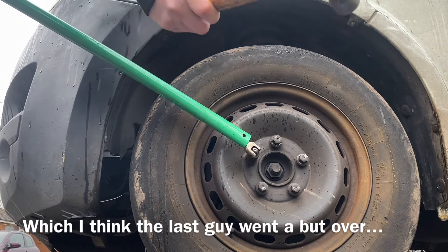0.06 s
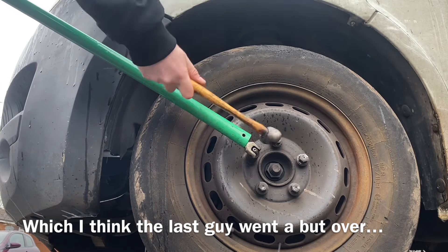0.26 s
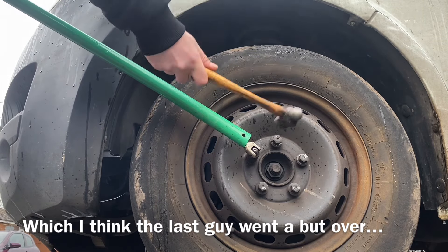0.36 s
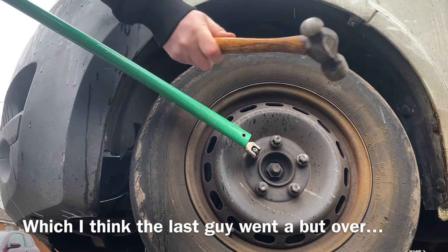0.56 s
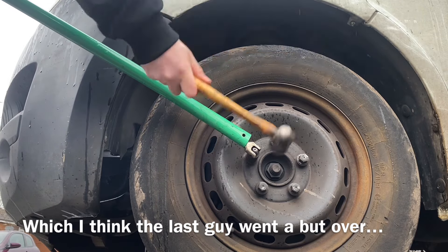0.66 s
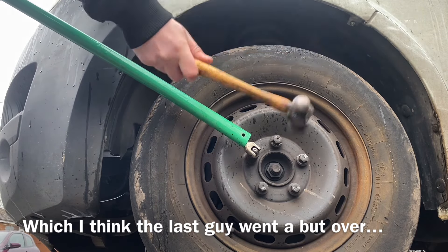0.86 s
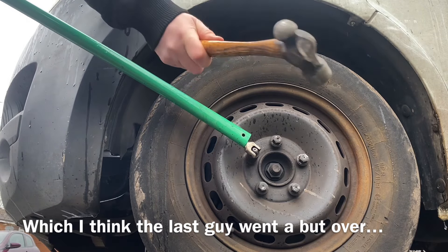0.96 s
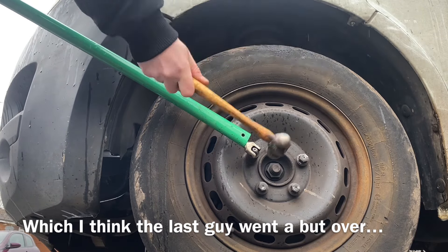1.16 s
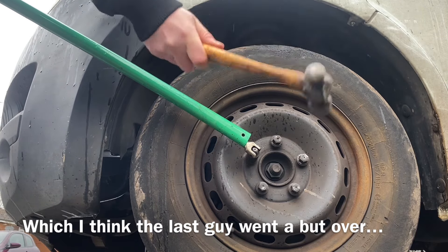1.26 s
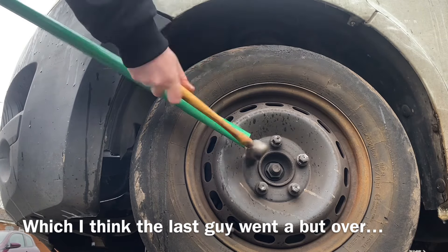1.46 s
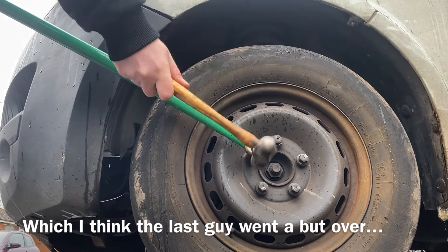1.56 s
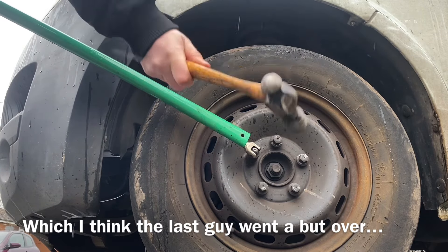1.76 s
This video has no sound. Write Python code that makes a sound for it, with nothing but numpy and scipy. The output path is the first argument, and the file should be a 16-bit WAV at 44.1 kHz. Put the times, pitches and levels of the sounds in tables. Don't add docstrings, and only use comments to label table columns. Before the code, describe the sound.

A hammer strikes a metal bar on a wheel nut, close and outdoors. Faint low wind and far traffic open, with tiny metal ticks near 0.07 and 0.18 seconds. Sharp clanks land at about 0.25, 0.7, 1.1 and 1.48 seconds, each with brief chatter, a dull wheel thump, short arch hiss and thin ringing. The last is brightest and heaviest; a faint yard reflection lingers.

```python
import sys
import numpy as np
from scipy import signal
from scipy.fft import rfft, irfft
from scipy.io import wavfile
from scipy.ndimage import uniform_filter1d

SR = 44100
rng = np.random.default_rng(int(sys.argv[2]) if len(sys.argv) > 2 else 0)


def voltage_ratio(decibels):
    exponent = np.asarray(decibels, float) / 20
    return 10 ** exponent


def dump(signal):
    limited = np.clip(np.atleast_2d(signal).T, -1, 1)
    pcm = np.round(limited * 32767).astype(np.int16)
    wavfile.write(sys.argv[1], SR, pcm)


N = 79380


def evened(x):
    return x / np.sqrt(np.mean(x ** 2) + 1e-20)


def read(points, hz):
    f, value = np.transpose(points)
    return np.interp(np.log(hz + 1), np.log(f + 1), value)


def add(mix, s, sound):
    part = mix[:, round(s * SR):][:, :sound.shape[-1]]
    part += sound[..., :part.shape[1]]


def seconds_axis(seconds):
    return np.arange(round(seconds * SR)) / SR


def noise(size, tone, same, tilt_db=0, peaks=()):
    hz = np.fft.rfftfreq(size, 1 / SR)
    left, other = rfft(rng.standard_normal((2, size)))
    likeness = np.clip(read(same, hz), 0, 1)
    level_db = read(tone, hz) + tilt_db * np.log2((hz + 50) / 2000)
    for centre_hz, width_hz, db in peaks:
        level_db = level_db + db / (1 + (2 * (hz - centre_hz) / width_hz) ** 2)
    knots = np.arange(0, SR / 2, 60)
    ripple_db = 5 * np.interp(hz, knots, rng.standard_normal(len(knots))) * (hz > 1500)
    right = likeness * left + np.sqrt(1 - likeness ** 2) * other
    return evened(irfft(np.array([left, right]) * voltage_ratio(level_db + ripple_db), size))


def dying(x, t60s):
    size = x.shape[1]
    hz, t = np.fft.rfftfreq(size, 1 / SR), np.arange(size) / SR
    spectrum = rfft(x)
    centres = np.log([f for f, _ in t60s])
    out = 0
    for row, (_, t60) in zip(np.eye(len(t60s)), t60s):
        window = np.interp(np.log(hz + 1), centres, row)
        out = out + irfft(spectrum * window, size) * voltage_ratio(-60 * t / t60)
    return out


def modes(table, seconds, spread_db, detune, turn):
    t, out = seconds_axis(seconds), 0
    for hz, db, t60 in table:
        u = rng.uniform(-0.76, 1, 5)
        side_turn = turn * u[1] * min(hz / 2000, 1)
        phase = np.pi * u[0] + np.array([[0], [side_turn]])
        fade = voltage_ratio(db + spread_db * u[2:4, None] - 60 * t / t60)
        out = out + fade * np.sin(2 * np.pi * hz * (1 + detune * u[4]) * t + phase)
    return out * np.minimum(t / 0.0048, 1)


# time_s, level_db
RUMBLE_LEVEL = [(0, -58), (.05, -56.5), (.3, -57.5), (.456, -49.5), (.62, -47), (.78, -56), (1.0, -61),
                (1.25, -53.5), (1.42, -60.5), (1.62, -50.5), (1.8, -61)]
# pitch_hz, level_db
RUMBLE_TONE = [(28, -30), (48, -1), (65, 0), (130, -8), (210, -17), (400, -28), (900, -50), (2500, -110)]
# pitch_hz, width_hz, level_db
RUMBLE_PEAKS = [(61.4, 8.3, 6.5), (133, 4, 10.5), (210, 39, 7.5)]
# pitch_hz, level_db
FLOOR_TONE = [(150, -27), (250, -7.5), (900, -11.5), (1150, -17), (2700, -25), (11000, -39.5),
              (12500, -67.5)]
# pitch_hz, likeness_0_to_1
SAME_FAR = [(60, 1), (180, 0.94), (550, 0.33), (1650, 0.027), (5000, 0.028), (15000, 0.5)]


def outdoors():
    t = np.arange(N) / SR
    lump = voltage_ratio(0.38 * evened(uniform_filter1d(rng.standard_normal(N), 2500)))
    swing = voltage_ratio(np.interp(t, *np.transpose(RUMBLE_LEVEL)))
    rumble = noise(N, RUMBLE_TONE, SAME_FAR, peaks=RUMBLE_PEAKS) * swing * lump
    return rumble + voltage_ratio(-69) * noise(N, FLOOR_TONE, SAME_FAR)


# start_s, level_db, pitch_hz
TICKS = [
    (.0668, -51.5, 2870),
    (.0668, -58, 5230),
    (.0668, -62.5, 1500),
    (.177, -59, 3330),
]


def add_ticks(mix):
    t = np.arange(200) / SR
    for s, db, hz in TICKS:
        add(mix, s, voltage_ratio(db - 60 * t / 0.0089) * np.sin(2 * np.pi * hz * t))


# pitch_hz, level_db
YARD_TONE = [(200, -14.5), (600, -9), (1500, -10), (3000, -19.5), (6300, -17), (7600, -13), (8300, -51),
             (16500, -78.5)]
# pitch_hz, t60_s
YARD_T60 = [(300, 1.4), (2000, 0.85), (5000, 1.01), (10000, 0.2), (15000, 0.48)]
# pitch_hz, width_hz, level_db
PANELS = [(586, 14, 22), (762, 18, 11), (875, 14, 14), (987, 12, 17), (1150, 200, -20), (1400, 40, 12),
          (2750, 400, 9), (4250, 300, 5)]
# pitch_hz, level_db
SHIMMER_TONE = [(8800, -41), (9100, 10), (11300, 0), (11550, -49), (12950, -52), (13200, -0.5), (14900, 8),
                (15400, -39.5)]
# pitch_hz, t60_s
SHIMMER_T60 = [(9000, 0.6), (11300, .7), (13200, .4), (14500, .42)]
YARD_DB = [-47.5, -72, -66, -68]
YARD_RISE_S = [0.93, 0.14, 0.2, 0.13]
SHIMMER_DB = [-66, -67, -69.5, -66]


def yard(k):
    t = np.arange(SR) / SR
    lump = voltage_ratio(1.7 * evened(uniform_filter1d(rng.standard_normal(SR), 1500)))
    swell = np.sin(np.pi / 2 * np.minimum(t / YARD_RISE_S[k], 1)) ** 1.3
    walls = dying(noise(SR, YARD_TONE, SAME_FAR, peaks=PANELS), YARD_T60) * swell * lump
    shimmer = dying(noise(SR, SHIMMER_TONE, SAME_FAR), SHIMMER_T60) * np.minimum(t / .01, 1)
    return voltage_ratio(YARD_DB[k] + 14.5) * walls + voltage_ratio(SHIMMER_DB[k] + 9) * shimmer


# pitch_hz, level_db
LEAD_IN_TONES = [
    [[(613, -39), (5673, -33.5), (6416, -19.5), (7445, -34.5)], [(570, -27), (1205, -33), (1367, -28),
     (1571, -26), (2180, -23), (2670, -13.5), (3014, -26.5), (4279, -17.5), (6416, -25)]],
    [[(511, -30.5), (5281, -27), (5743, -22)], [(780, -24), (1647, -19), (1830, -21), (2454, -22),
     (2675, -21.5), (3046, -27), (3585, -35.5), (5286, -28), (6476, -17.5)]],
    [[(220, -38), (1076, -46.5), (6163, -34), (7972, -47)], [(1071, -40.5), (1372, -31.5), (1647, -40.5),
     (2207, -46), (2492, -33.5), (3300, -51), (3800, -47.5), (6174, -34.5), (6917, -45), (7967, -44.5)]],
    [[(764, -30), (4495, -55), (5108, -47), (5528, -37), (6653, -38)], [(387, -39.5), (635, -32.5),
     (1458, -33), (1819, -38), (2583, -41.5), (2863, -37.5), (5097, -40), (6659, -59)]],
]
LEAD_IN_S = [.018, .02, .025, .026]
LEAD_IN_HISS_DB = [-26.5, -33.5, -38, -39.5]
LEAD_IN_CURVE = [3.05, 5.2, 2.6, 3.2]


def lead_in(k):
    t = seconds_axis(LEAD_IN_S[k])
    tones = []
    for side in LEAD_IN_TONES[k]:
        tones.append(sum(voltage_ratio(db) * np.sin(2 * np.pi * (hz * t + rng.random())) for hz, db in side))
    hiss_tone = [(300, -4.5), (2500, 5.5), (7000, -16), (8500, -47.5)]
    hiss = voltage_ratio(LEAD_IN_HISS_DB[k]) * noise(len(t), hiss_tone, [(100, 0.14), (9000, .1)])
    swell = np.sin(np.pi / 2 * t / LEAD_IN_S[k]) ** LEAD_IN_CURVE[k]
    return np.array(tones) * swell + hiss * (t / LEAD_IN_S[k]) ** 3.1


# start_hz, end_hz, glide_s, knee_power, rise_s
THUMPS = [
    (523, 34, .0044, 4.1, .0027),
    (523, 34, .0044, 4.1, .0027),
    (640, 79, .0046, 4.6, .0047),
    (662, 49, .0041, 2, .009),
]
THUMP_LATE_S = [0, .0006, 0, 0]
KNOCK_DB = [-21, -20, -9.5, -10.5]


def thump(k, db):
    start_hz, end_hz, glide, knee, rise = THUMPS[k]
    pan_db, lag_s, turn = .8, .00006, -.2
    t = np.maximum(np.arange(SR // 5) / SR - THUMP_LATE_S[k] - np.array([[lag_s], [0]]), 0)
    pitch = end_hz + (start_hz - end_hz) / (1 + (t / glide) ** knee)
    turns = np.cumsum(pitch * (t > 0), axis=1) / SR + turn
    wave = voltage_ratio(db - 60 * t / .058) * np.minimum(t / rise, 1) * np.sin(2 * np.pi * turns)
    knock = voltage_ratio(KNOCK_DB[k] - 60 * t / .035) * np.minimum(t / .003, 1)
    knock = knock * np.cos(2 * np.pi * (553 * t - turn))
    return voltage_ratio([[pan_db], [-pan_db]]) * (wave + knock)


BLOW_S = .7
# pitch_hz, level_db
CRACK = [(300, -49), (700, -12), (3630, -15.5), (8480, -16.5), (9830, -8), (12000, -19.5), (14800, -13.5),
         (16500, -47.5)]
# pitch_hz, likeness_0_to_1
SAME_NEAR = [(60, 0.28), (180, 0.95), (550, 0.64), (1650, 0.12), (5000, 0.025), (15000, 0.09)]


def chatter(db, length, tilt_db):
    t = seconds_axis(BLOW_S)
    bounce = 0.39 + 0.35 * np.cos(2 * np.pi * 310 * t) ** 2 + 2.5 * np.exp(-t / 0.00091)
    hold = np.minimum(t / 0.00053, 1) * voltage_ratio(-60 * np.maximum(t - length, 0) / 0.019)
    peaks = [(1089, 98, -13), (12130, 540, -11.5), (9330, 150, 4), (10010, 230, 7.5)]
    rattle = noise(len(t), CRACK, SAME_NEAR, tilt_db, peaks) * bounce * hold
    tick_tone = [(1500, -28.0), (4000, -15), (15000, 1.5), (16500, -10.5)]
    tick = noise(len(t), tick_tone, SAME_NEAR) * np.minimum(t / 0.00008, 1) * np.exp(-t / 0.00089)
    return voltage_ratio(db) * rattle + voltage_ratio(db - 8) * tick


# pitch_hz, level_db, t60_s
CLANK_END = [(554, -3, .1), (895, -8, 0.068), (1603, -5, 0.023), (2102, -11.5, 0.067), (2673, -15.5, 0.14),
             (4280, -16, 0.065), (6350, 3, 0.025), (7700, 0.5, 0.026), (9500, -17.5, 0.062),
             (9660, -15.5, 0.027), (14400, -17, 0.053), (15100, -19, .07)]
# pitch_hz, level_db, t60_s
CLANK_LATER = [(582.3, -14, .12), (908, 0.5, 0.036), (1350, -3, 0.037), (2047, -5, 0.032),
               (2856, -13.5, 0.083), (4135, -10, 0.035), (5970, -32, 0.15), (7300, -31, 0.083),
               (6470, -24, 0.025), (13930, -18, 0.063), (9257, -12.5, 0.044), (10090, -7, 0.036),
               (14000, -16, 0.049)]
CLANK_DB = [-11, -16.5, -10, -11]


def clank(k):
    t = seconds_axis(BLOW_S)
    table = (CLANK_END, CLANK_LATER)[k // 2]
    return voltage_ratio(CLANK_DB[k]) * modes(table, BLOW_S, -4, .006, 0.69) / (1 + (t / 0.024) ** 2)


# pitch_hz, level_db
ARCH_TONE = [(100, -6), (830, -1), (1140, -10.5), (2680, -9.5), (3470, -19), (9000, -4), (14500, -15),
             (15600, -65.5)]
# pitch_hz, t60_s
ARCH_T60 = [(100, 0.23), (300, 0.16), (1000, 0.14), (4000, 0.13), (9000, 0.071), (15000, 0.062)]
# pitch_hz, width_hz, level_db
ARCH_GAPS = [(12040, 710, -38), (8450, 480, -25), (1120, 130, -8.5), (9050, 60, 8.5), (14500, 200, 12)]


def arch_echoes():
    t = seconds_axis(BLOW_S)
    hiss = noise(len(t), ARCH_TONE, SAME_NEAR, peaks=ARCH_GAPS)
    return voltage_ratio(-21.5) * dying(hiss, ARCH_T60) * np.minimum(t / 0.0047, 1)


# pitch_hz, level_db, t60_s
LOW_RING = [(553, -2, .15), (765, -4, .24), (1385, -2, .2), (2948, -15, .4)]
# pitch_hz, level_db, t60_s
HIGH_RING = [(5523, -8, .3), (7387, -4, .3), (7493, 3, .36), (11300, -14, .15), (14320, -6, .1)]
# pitch_hz, level_db, t60_s
LONG_RING = [(2604, 0, 1.1)]
# pitch_hz, level_db, t60_s
MID_RING = [(2720, -1.5, .42)]
# lower_db, upper_db, long_db, middle_db
RING_DB = [
    (-37.5, -55, -47, -44),
    (-45, -56, -53.5, -44.5),
    (-40.5, -51.5, -57, -49),
    (-37.5, -48, -65.5, -46),
]


def bar_ring(k):
    low_db, high_db, long_db, mid_db = RING_DB[k]
    t = seconds_axis(BLOW_S)
    long_shape = np.minimum(t / 0.032, 1) * np.clip((BLOW_S - t) / .3, 0, 1)
    out = voltage_ratio(mid_db) * modes(MID_RING, BLOW_S, 1.7, 0.00034, .43)
    out += voltage_ratio(long_db) * modes(LONG_RING, BLOW_S, 1.3, 0.00026, 2.7) * long_shape
    out += voltage_ratio(low_db) * modes(LOW_RING, BLOW_S, 1.8, 0.00051, 0.39)
    return out + voltage_ratio(high_db) * modes(HIGH_RING, BLOW_S, 3.3, 0.00046, 0.4)


# start_s, chatter_db, chatter_s, brightness_db_per_octave, thump_db
BLOWS = [
    (0.2543, -17, 0.0046, -2, -11),
    (0.7036, -16.5, 0.0024, -1.4, -12),
    (1.0962, -17.5, 0.006, -2, -11),
    (1.4811, -16.5, 0.0044, 2.5, -8),
]


def scene():
    mix = outdoors()
    add_ticks(mix)
    for k, (s, chatter_db, length, tilt_db, thump_db) in enumerate(BLOWS):
        add(mix, s, yard(k))
        add(mix, s - LEAD_IN_S[k], lead_in(k))
        add(mix, s, thump(k, thump_db))
        add(mix, s, chatter(chatter_db, length, tilt_db) + clank(k) + arch_echoes() + bar_ring(k))
    return mix


def band_limit(x):
    return signal.sosfilt(signal.butter(12, 16630, fs=SR, output="sos"), x)


def record(dry):
    held = np.tanh(dry / 0.83) * 1.255
    edge = signal.firwin(511, 16100, window=("kaiser", 9), fs=SR)
    return band_limit(signal.oaconvolve(held, edge[None], "same"))


dry = scene()
out = record(dry)
dump(out)
```